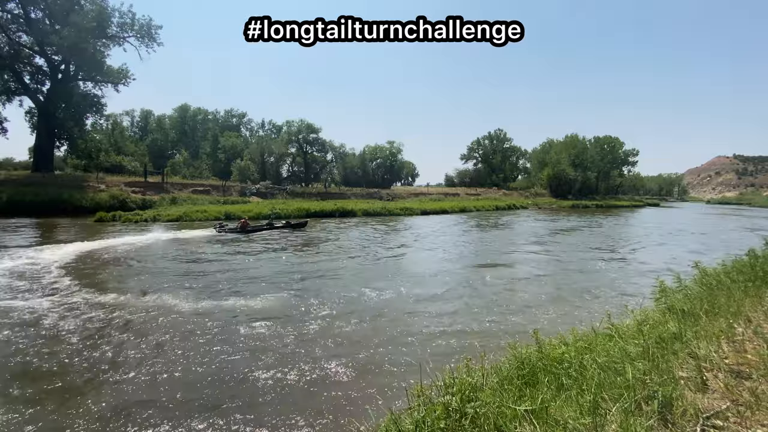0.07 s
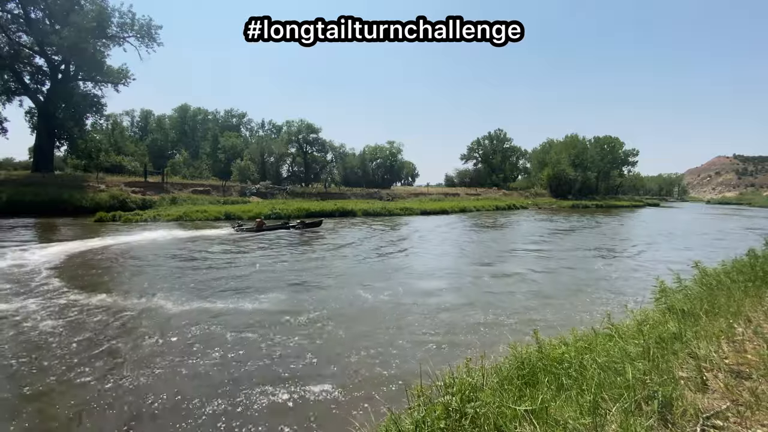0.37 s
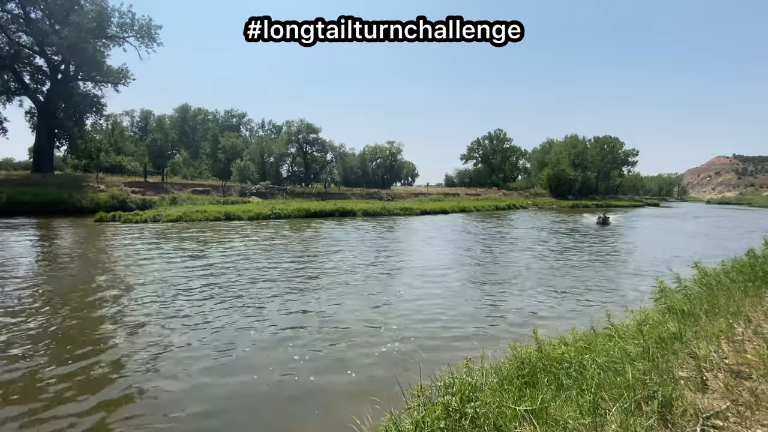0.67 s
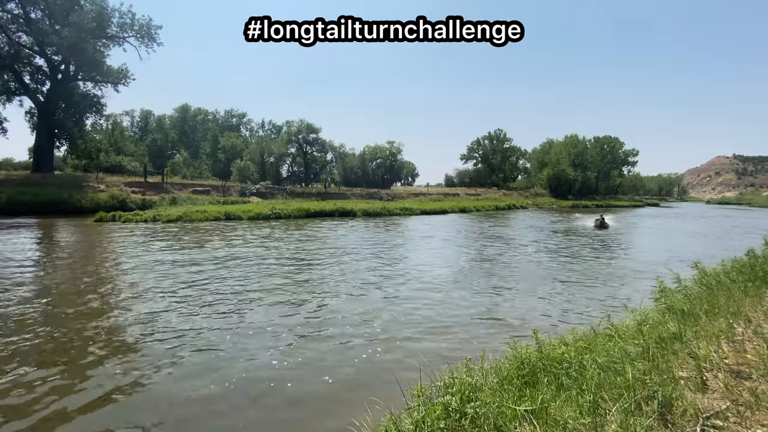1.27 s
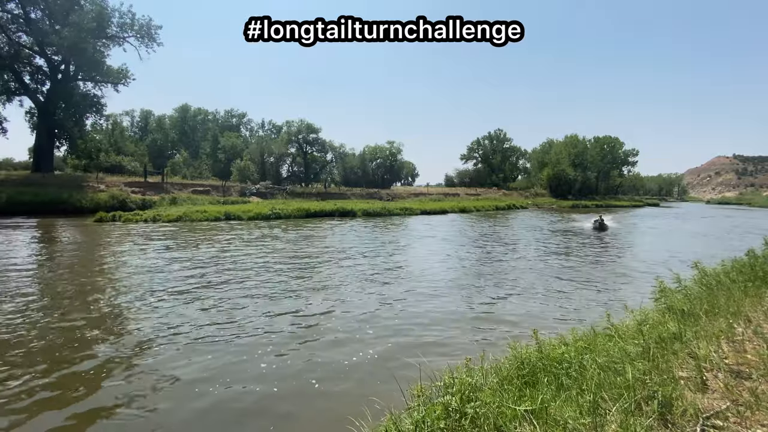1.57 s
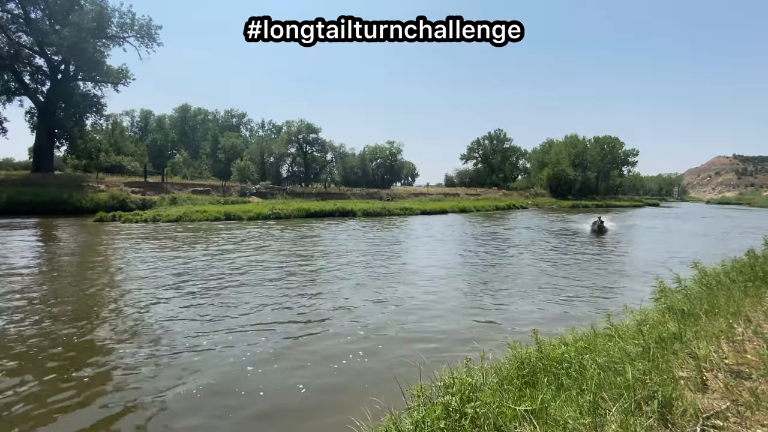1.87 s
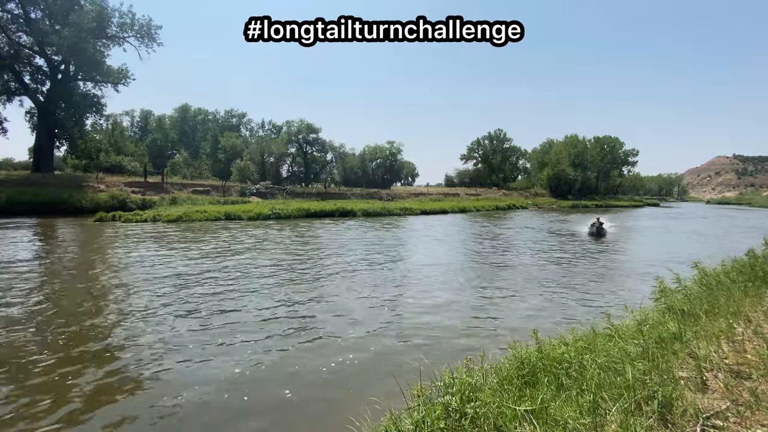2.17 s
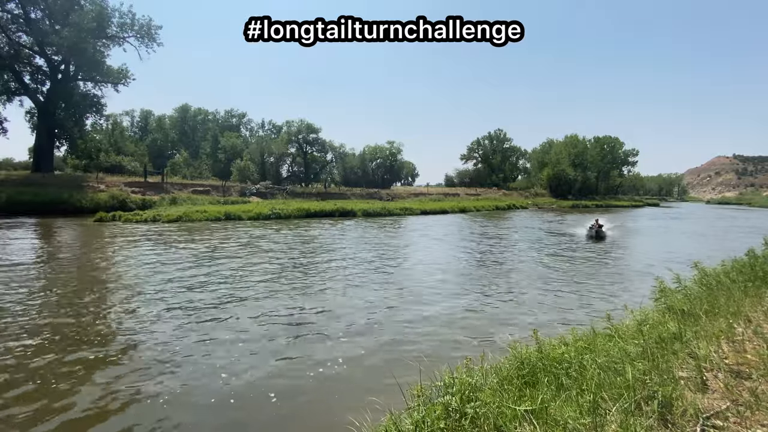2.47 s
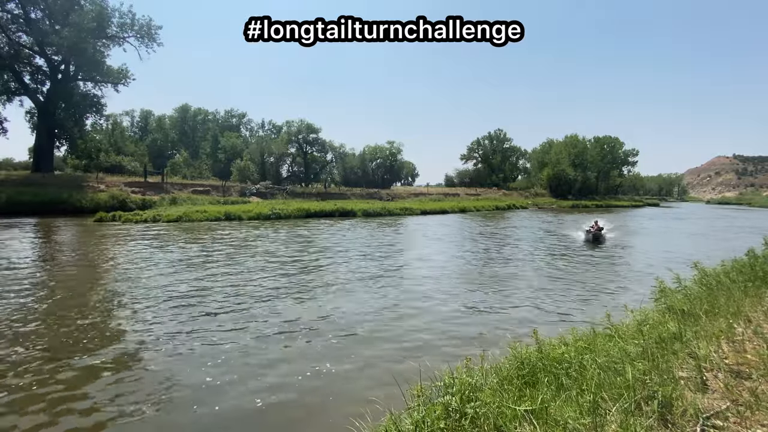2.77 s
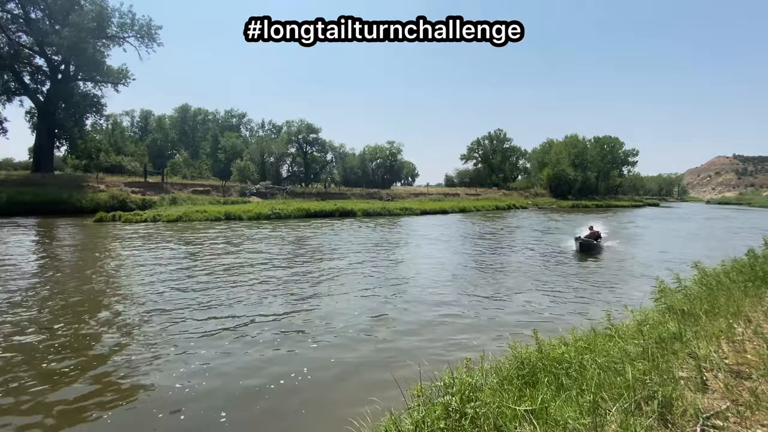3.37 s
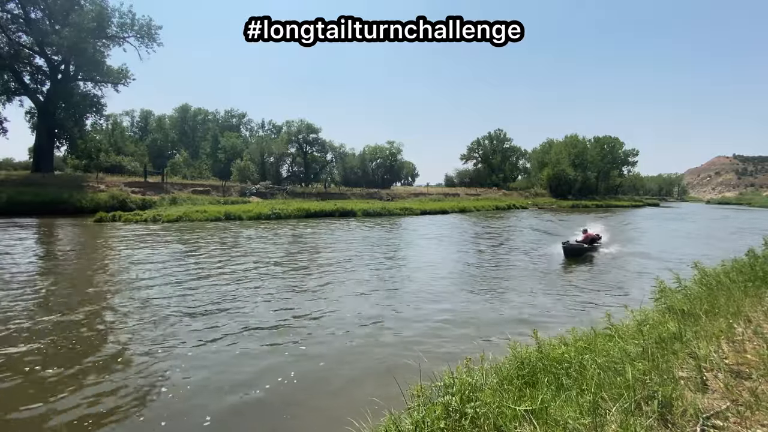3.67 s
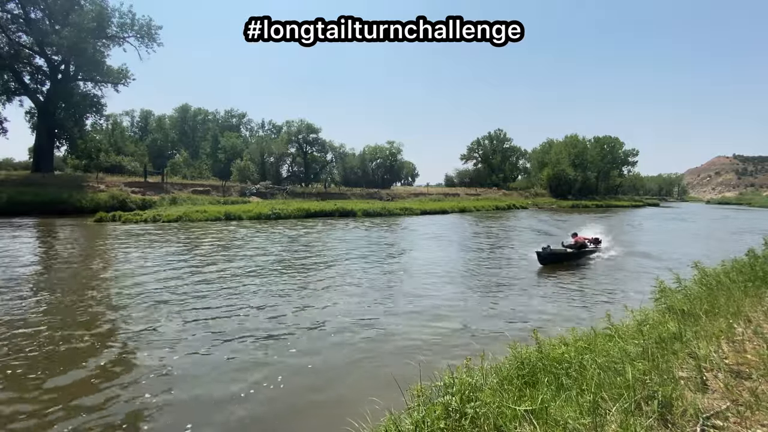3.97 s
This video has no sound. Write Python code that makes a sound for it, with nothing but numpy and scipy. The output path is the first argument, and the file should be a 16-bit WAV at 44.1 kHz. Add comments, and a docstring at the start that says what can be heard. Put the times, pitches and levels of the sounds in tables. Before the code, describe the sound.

A boat engine barks close by, then drones from far off, approaching over water.

```python
"""A long-tail boat's engine on a calm river, heard from the bank in two scenes.
First it barks close by, powering out of a turn; then it drones toward the listener from far off.
Each engine cycle rings the exhaust pipe and blows out puffs of gas; the engine stumbles three times.
Behind it, spray hisses and water slaps the hull."""
import sys
import numpy as np
from scipy import signal
from scipy.fft import rfft, irfft
from scipy.io import wavfile

SR = 44100
rng = np.random.default_rng(int(sys.argv[2]) if len(sys.argv) > 2 else 0)


def to_wav(sig):
    """Store sig (one row per channel, or 1-D mono) as 16-bit WAV at the path in sys.argv[1].

    Samples outside -1..1 are clipped; the rate is SR.
    """
    pcm = np.clip(np.atleast_2d(sig), -1, 1) * 32767
    pcm = np.round(pcm).astype(np.int16)
    wavfile.write(sys.argv[1], SR, pcm.T)  # frames by channels


N = 176400
T = np.arange(N) / SR
HZ = np.fft.rfftfreq(N, 1 / SR)


def amp(db):
    """Turns decibels into a gain to multiply by."""
    return 10 ** (np.asarray(db) / 20)


def unit_level(x):
    """Scales a signal to an average (rms) level of 1."""
    return x / np.sqrt(np.mean(x ** 2) + 1e-20)


def over_pitch(rows):
    """Joins a table's points into a value for every frequency."""
    pitch_hz, value = np.transpose(rows)
    return np.interp(np.log(HZ + 1), np.log(pitch_hz + 1), value)


def over_time(rows, column=1):
    """Joins a table's points into a value for every sample."""
    rows = np.asarray(rows)
    return np.interp(T, rows[:, 0], rows[:, column])


def drift(rate_hz):
    """A random wobble, mostly slower than rate_hz."""
    return unit_level(irfft(rfft(rng.standard_normal(N)) / (1 + (HZ / rate_hz) ** 4), N))


def bumps(rows):
    """Brief smooth changes of level, in dB."""
    return sum(db * np.exp(-((T - middle_s) / width_s) ** 2) for middle_s, width_s, db in rows)


def shaped_noise(tone_db, loudness=1):
    """Left and right noise, shaped in time by loudness and then filtered to a tone."""
    # how alike the two sides are: pitch_hz, likeness (0 to 1)
    likeness = [(100, 1), (500, 0.91), (1500, 0.76), (3000, 0.76), (7000, 0.72), (11000, 0.99)]
    same = np.clip(over_pitch(likeness), 0, .999)
    left, other = rfft(rng.standard_normal((2, N)))
    noise = irfft(np.array([left, same * left + np.sqrt(1 - same ** 2) * other]), N)
    # this filter rings only after a sound, never before it
    log_gain = np.log(amp(np.maximum(tone_db, -100)))
    mirrored = np.r_[log_gain, log_gain[-2:0:-1]]
    taps = np.fft.ifft(np.exp(np.conj(signal.hilbert(mirrored)))).real[:4096]
    return unit_level(signal.oaconvolve(noise * loudness, taps[None], axes=1)[:, :N])


def burst(start_s, level_db, decay_s, tone_db):
    """Noise that starts at once and dies away."""
    return amp(level_db) * (T >= start_s) * np.exp(-abs(T - start_s) / decay_s) * shaped_noise(tone_db)


def place(sound, lead, balance):
    """Gives the boat a direction: one side hears it earlier or louder than the other."""
    lead_rad = np.interp(HZ, *np.transpose(lead)) * np.minimum(HZ / 100, 1)
    left = np.exp(.5j * lead_rad) * amp(over_pitch(balance) / 2)
    return irfft(rfft(sound) * np.array([left, 1 / left]), N)


def count_cycles(speed_hz, first_firing_s):
    """Engine cycles counted from the first firing."""
    cycles = np.cumsum(speed_hz) / SR
    return cycles - np.interp(first_firing_s, T, cycles)


def pulse(cycles, lag, decay):
    """Jumps up and fades once per engine cycle; lag and decay are in cycles."""
    return np.exp(-((cycles - lag) % 1) / decay)


def puffs(cycles, lag, decay, steady):
    """Two cylinders puff over a steady flow, the second one late and weaker."""
    return unit_level(steady + pulse(cycles, lag, decay) + 0.3 * pulse(cycles, lag + .76, decay))


def firing_strength():
    """How hard the engine fires: 1, with a dip at each stumble."""
    # weak firings: middle_s, width_s, drop_db
    stumbles = [(0.437, 0.013, 13.5), (2.84, 0.017, 3), (3.475, 0.016, 2)]
    return amp(-bumps(stumbles))


def water_slaps():
    """Bright ticks of spray and duller slaps on the hull."""
    # each hit of water: start_s, level_db, decay_s, tilt_db_per_octave
    slaps = [(.937, -38.5, .006, 6), (2.062, -34.5, .009, 0), (3.122, -34, .022, 1), (3.498, -26, .017, -6),
             (3.743, -29, .012, -4)]
    # their tone before tilting: pitch_hz, level_db
    tone = [(400, -23), (1000, 3), (1800, 5), (3000, 3), (4500, 3.5), (7000, -7), (12000, -15),
            (15500, -22)]
    octaves = np.log2(np.maximum(HZ, 700) / 3000)
    return sum(burst(start_s, level_db, decay_s, over_pitch(tone) + tilt * octaves)
               for start_s, level_db, decay_s, tilt in slaps)


def hiss(loudness, tone, patchy_db, grain_db):
    """Hiss whose level wobbles in slow patches and fast grains."""
    wobble = amp(patchy_db * drift(20) + grain_db * drift(1100))
    return shaped_noise(over_pitch(tone), loudness * wobble)


def hull_spray(cycles):
    """Spray hisses off the hull; its top octave grows as the boat nears."""
    # tone of the spray: pitch_hz, level_db
    tone = [(500, -27), (1900, -8.5), (3000, 0), (3900, -3), (4800, -5), (7000, -12.5), (10000, -18.5),
            (12000, -19), (14000, -29), (15700, -31)]
    spray = hiss(puffs(cycles, lag=.01, decay=.44, steady=1.18), tone, patchy_db=1.23, grain_db=1)
    treble = irfft(rfft(spray) / (1 + (7500 / (HZ + 1)) ** 6), N)
    treble_db = -4 + 10 * np.exp(T - T[-1])
    return spray + treble * (amp(treble_db) - 1)


def engine_rattle(cycles):
    """Spray and machinery hiss in time with the engine, with one dry crack per cycle."""
    # tone of the hiss: pitch_hz, level_db
    hiss_tone = [(500, -35), (1900, -1.5), (3000, 0), (3900, -3), (4700, -2.5), (6000, -7.5), (8000, -9),
                 (11200, -11.5), (13000, -19), (15500, -29)]
    # tone of the crack: pitch_hz, level_db
    crack_tone = [(1500, -25), (3000, -4), (4700, 1), (6000, -3), (8500, -5), (11000, -2), (13000, -14),
                  (15500, -12)]
    rattle = hiss(1.2 + pulse(cycles, lag=.07, decay=.2), hiss_tone, patchy_db=1.7, grain_db=-1)
    crack = hiss(pulse(cycles, lag=.805, decay=.1), crack_tone, patchy_db=2, grain_db=3)
    return rattle + crack * amp(-2) * firing_strength()


def gas_rush(flow, tone, flutter_db):
    """Swirling gas rushes through the pipe with each puff."""
    loudness = flow * np.sqrt(firing_strength()) * amp(flutter_db * drift(10.6))
    return shaped_noise(over_pitch(tone), loudness)


def misfire():
    """The first stumble pops in the pipe, and an afterfire bangs out of the exhaust soon after."""
    # tone of the afterfire: pitch_hz, level_db
    tone = [(200, -18), (600, 4), (1050, 10), (1800, -33), (2700, -26), (4200, -14), (8000, -21),
            (15000, -38)]
    pop_s, width_s, pitch_hz = .438, .0014, 1020
    pop = amp(-15) * np.exp(-((T - pop_s) / width_s) ** 2) * np.sin(2 * np.pi * pitch_hz * (T - pop_s))
    return pop + burst(start_s=.4692, level_db=-12.5, decay_s=.004, tone_db=over_pitch(tone))


def exhaust_pipe(speed_hz, cycles, tone, echoes, sweep_rad, drone=1):
    """One blow per cycle rings the pipe, making harmonics: tones at multiples of the engine speed."""
    # brief swells around one pitch: middle_s, width_s, boost_db, pitch_hz
    surges = [(.13, .09, 4, 140), (1.135, .035, 6, 268), (1.195, .022, 6.5, 268), (1.68, .04, 3, 268),
              (1.885, .022, 6.5, 268), (3.75, .25, 2.5, 205)]
    full_speed_hz, surge_width_hz = 33, 45
    multiples, levels_db = np.transpose(tone)
    harmonics = np.arange(1, round(multiples[-1]) + 1)
    gains = amp(np.interp(harmonics, multiples, levels_db))
    # line the harmonics up into a blow that rings away
    log_gain = np.log(np.r_[gains[0], gains])
    phases = -signal.hilbert(np.r_[log_gain, log_gain[-2:0:-1]]).imag[harmonics]
    phases -= sweep_rad * harmonics ** 2  # the treble arrives later
    for delay, direct in echoes:
        late = np.exp(-2j * np.pi * harmonics * delay)
        phases += np.angle((direct + late) / (1 + direct * late))
    angle = 2 * np.pi * (cycles + .003 * drift(21.7))  # slightly uneven timing
    ring = 0
    for k, gain, phase in zip(harmonics, gains, phases):
        if k > 5:  # above the bass, harmonics glide through the pipe's fixed resonances
            gain = drone * amp(np.interp(k * speed_hz / full_speed_hz, multiples, levels_db))
        pitch_hz = k * full_speed_hz
        swell_db = bumps([(middle_s, width_s, db * np.exp(-((pitch_hz - hz) / surge_width_hz) ** 2))
                          for middle_s, width_s, db, hz in surges
                          if abs(pitch_hz - hz) < 2 * surge_width_hz])
        waver_db = 2.2 * min(k / 14, 1) * drift(5)
        ring += gain * amp(swell_db + waver_db) * np.cos(k * angle + phase)
    flicker_db = drift(31)
    return -ring / np.sqrt(np.sum(gains ** 2) / 2) * amp(flicker_db) * firing_strength()


def approaching_boat():
    """Far off and head-on: a dull throb under spray that brightens on the way in."""
    # engine speed: time_s, cycles_per_s
    speed = [(0.62, 33.11), (1.0, 32.83), (1.25, 32.94), (1.54, 33.27), (2.12, 33.36), (2.3, 33.17),
             (2.6, 33.38), (2.8, 33.52), (2.87, 31.63), (2.99, 32.25), (3.25, 33.17), (3.43, 33.55),
             (3.51, 31.89), (3.6, 32.49), (3.75, 33.52), (4.0, 33.63)]
    # tone of the pipe: pitch (multiples of full engine speed), level_db
    pipe_tone = [(1, -50.5), (2, -25.5), (3, -30.5), (4, -25), (5, -32), (6, -23), (7, -26), (8, -24.5),
                 (9, -29.5), (10, -45), (11, -39.5), (12, -42), (13, -36.5), (14, -36.5), (15, -32.5),
                 (16, -41), (17, -53), (18, -41), (19, -44.5), (20, -41), (21, -50), (22, -50.5), (23, -48),
                 (26, -55), (29, -59.5), (33, -55.5), (39, -69), (48, -68)]
    # echoes that spread each blow: delay_cycles, direct_share (0 to 1)
    echoes = [(.311, .85)]
    # tone of the gas: pitch_hz, level_db
    gas_tone = [(20, -26), (55, -12), (100, 1), (160, -1), (280, -4), (370, -5), (490, -8), (600, -10.5),
                (800, -11), (1100, -14), (1400, -16), (2000, -20), (3000, -32), (6000, -58)]
    # loudness of the pipe's bass and the spray: time_s, bass_db, spray_db
    levels = [(.65, -21, -46.5), (1.03, -20, -42.5), (1.13, -21.5, -47), (1.26, -19.5, -43.5),
              (1.5, -20.5, -47), (1.9, -20.5, -42.5), (2.15, -20, -46.5), (2.28, -19, -39),
              (2.6, -19.5, -43.5), (2.8, -19.5, -40.5), (2.95, -18, -43.5), (3.3, -15.5, -43),
              (3.48, -18.5, -43), (3.7, -16.5, -43), (4, -15.5, -37.5)]
    # loudness of the pipe above the bass: time_s, level_db
    drone_level = [(.65, -22), (1.0, -21), (1.4, -19), (1.6, -19.5), (1.8, -19.5), (2.3, -18), (2.5, -17),
                   (2.8, -15.5), (2.87, -19.5), (3.0, -17.5), (3.1, -15.5), (3.42, -16), (3.48, -18),
                   (3.55, -16.5), (4, -17.5)]
    # loudness of the gas: time_s, level_db
    gas_level = [(.65, -29.7), (1.5, -30), (2.5, -28.7), (3.3, -27.3), (4, -24.5)]
    # how far the left side is ahead: pitch_hz, lead_radians
    lead = [(0, 0), (690, -1.5), (3100, -3), (5770, -8.5), (6720, -6.5), (8180, -10.5), (9040, -14.5),
            (9650, -16.5), (10400, -18.5), (12000, -18), (12500, -33), (13700, -24), (14600, -23),
            (16400, -29)]
    # how much louder the left side is: pitch_hz, level_db
    balance = [(60, 2), (110, 3), (200, 1.5), (380, 1.5), (700, -4), (1290, -3), (2380, 0.5), (4400, 0.5),
               (8120, -2), (15000, 1)]
    speed_hz = over_time(speed)
    cycles = count_cycles(speed_hz, first_firing_s=.6342)
    bass = amp(over_time(levels))
    drone = amp(over_time(drone_level)) / bass
    pipe = exhaust_pipe(speed_hz, cycles, pipe_tone, echoes, sweep_rad=.016, drone=drone) * bass
    flow = puffs(cycles, lag=.15, decay=.18, steady=2.2)
    gas = gas_rush(flow, gas_tone, flutter_db=1) * amp(over_time(gas_level))
    spray = hull_spray(cycles) * amp(over_time(levels, column=2))
    return place(pipe + gas + spray + water_slaps(), lead, balance)


def turning_boat():
    """Close and side-on at full throttle: a bright bark with cracking, rattling treble."""
    # engine speed: time_s, cycles_per_s
    speed = [(0.0, 28.69), (0.2, 29.79), (0.36, 32.64), (0.42, 32.39), (0.47, 32.28), (0.61, 34.08)]
    # tone of the pipe: pitch (multiples of full engine speed), level_db
    pipe_tone = [(1, -47), (2, -24), (3, -32.5), (4, -24.5), (5, -26), (6, -31), (7, -35.5), (8, -33.5),
                 (10, -33), (11.7, -25.5), (13, -32), (14.7, -24), (16, -29.5), (17.3, -42), (19.7, -34),
                 (22, -41), (24.5, -41.5), (27.3, -40), (30, -42), (31.5, -47.5), (32.7, -36.5),
                 (34.5, -66), (38, -52), (40.5, -52.5), (42, -45.5), (44.5, -49), (52, -50.5)]
    # echoes that spread each blow: delay_cycles, direct_share (0 to 1)
    echoes = [(.35, .67)]
    # tone of the gas: pitch_hz, level_db
    gas_tone = [(20, -24), (60, -10), (130, 0), (230, -6), (490, -4), (750, -7), (1050, -7), (1400, -12),
                (2000, -19), (3000, -29), (6000, -55)]
    # loudness through the turn: time_s, exhaust_db, rattle_db
    levels = [(0, -16.5, -35), (.25, -18, -35.5), (.4, -15, -35), (.6, -16.5, -35)]
    # how far the left side is ahead: pitch_hz, lead_radians
    lead = [(0, 0), (690, 1.5), (1460, 1.64), (4390, 5), (5430, 8), (6550, 7), (7410, 7), (8100, 10.5),
            (9560, 2), (11600, -0.3), (12600, -2.5), (13700, -6), (14800, -5), (16400, -8)]
    # how much louder the left side is: pitch_hz, level_db
    balance = [(60, 2), (110, 1.5), (200, 2.5), (380, 3), (700, 10.5), (1290, 5.5), (2380, 0), (4400, 5.5),
               (8120, 1.5), (15000, -1)]
    speed_hz = over_time(speed)
    cycles = count_cycles(speed_hz, first_firing_s=.0108)
    pipe = exhaust_pipe(speed_hz, cycles, pipe_tone, echoes, sweep_rad=.021)
    flow = puffs(cycles, lag=.05, decay=.31, steady=.19)
    gas = gas_rush(flow, gas_tone, flutter_db=-2.9) * amp(-12.5)
    exhaust = (pipe + gas) * amp(over_time(levels))
    rattle = engine_rattle(cycles) * amp(over_time(levels, column=2))
    return place(exhaust + rattle + misfire(), lead, balance)


def scene():
    """The close turn ends suddenly and the far approach fades in quickly."""
    change_s = .614
    fade_out = np.clip((change_s - T) / .0039, 0, 1)
    fade_in = np.clip((T - change_s + .0054) / .025, 0, 1)
    return fade_out * turning_boat() + fade_in * approaching_boat()


def record(dry):
    """Rounds off the loudest barks, then removes the very highest treble."""
    ceiling, top_hz = .9, 15850
    rounded = dry / (1 + (dry / ceiling) ** 4) ** .25
    low_pass = signal.firwin(511, top_hz, window=("kaiser", 9), fs=SR)
    return signal.oaconvolve(rounded, low_pass[None], "same")


dry = scene()
out = record(dry)
to_wav(out)
```